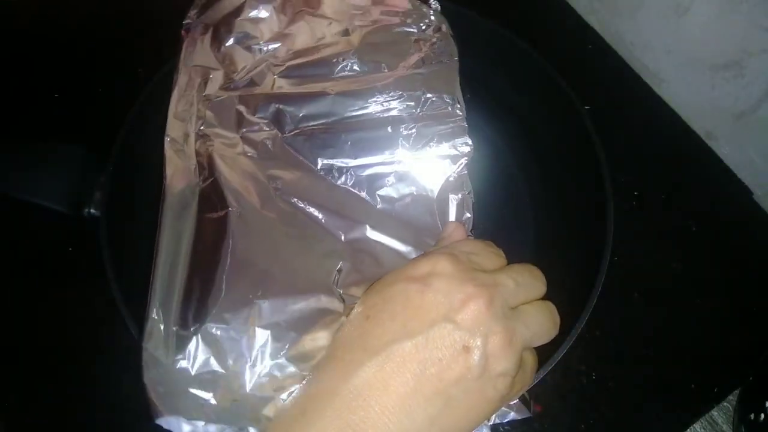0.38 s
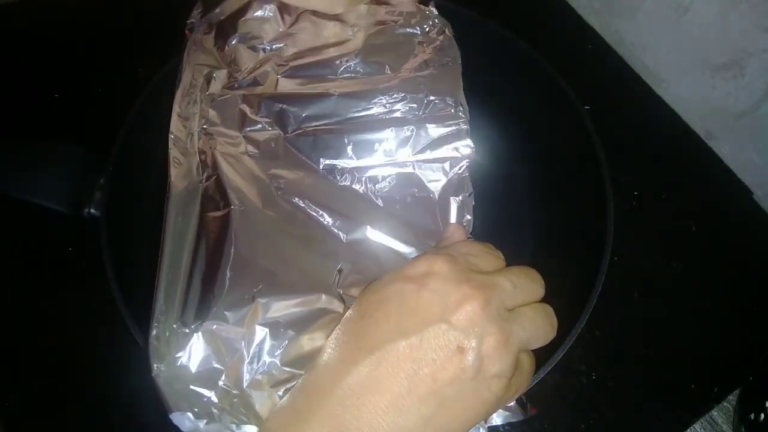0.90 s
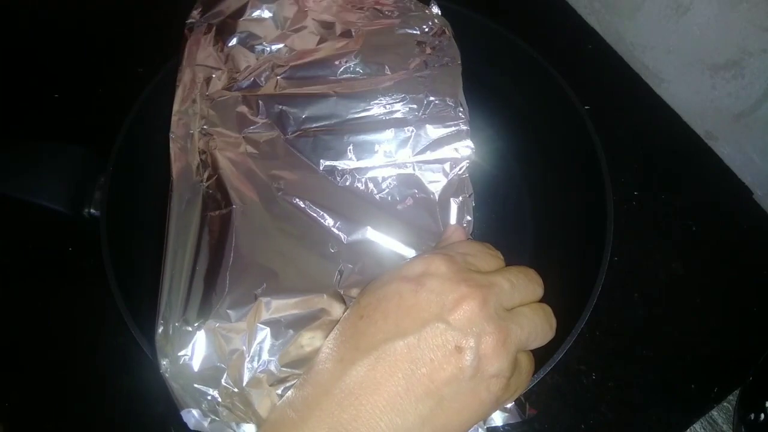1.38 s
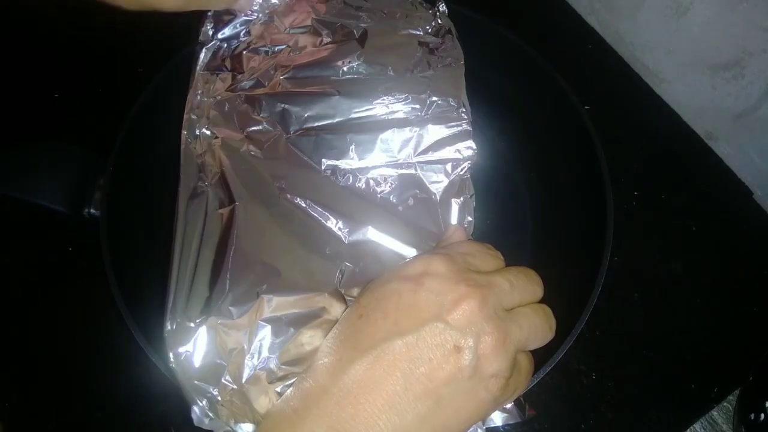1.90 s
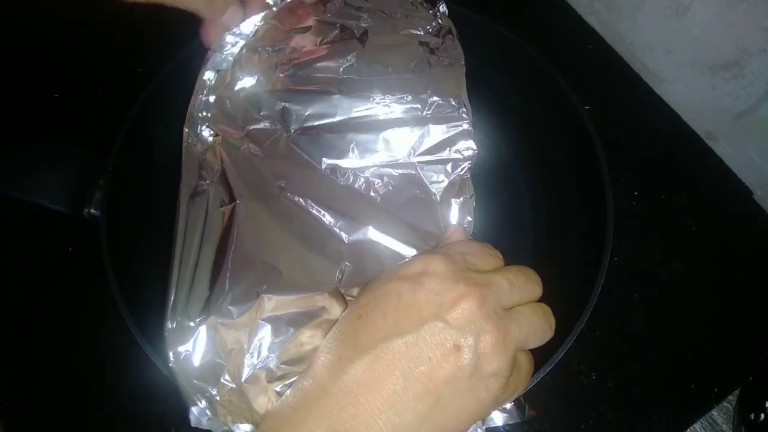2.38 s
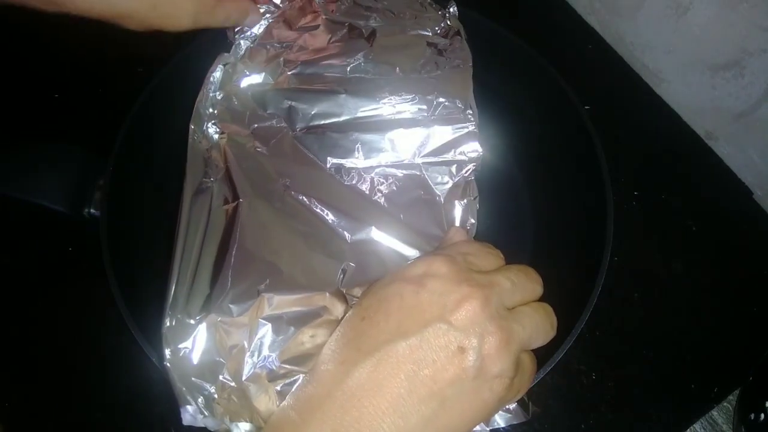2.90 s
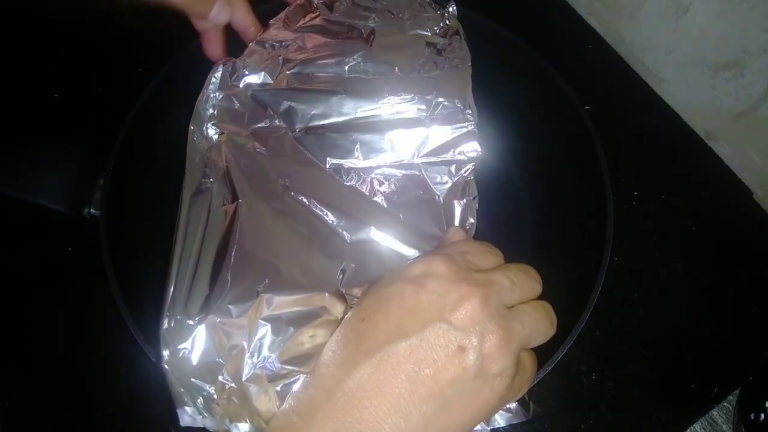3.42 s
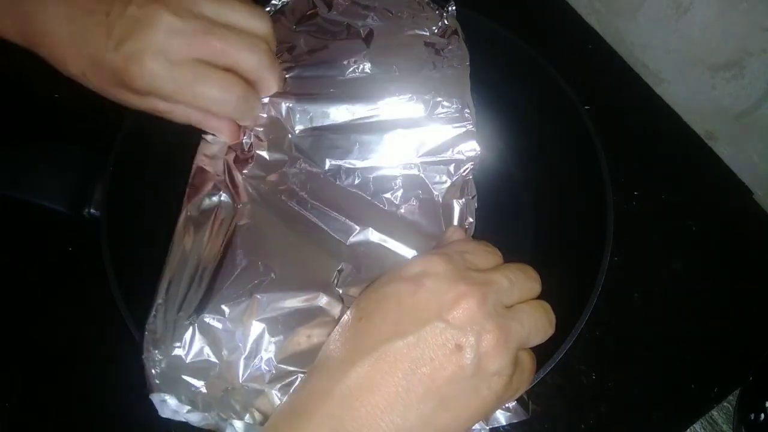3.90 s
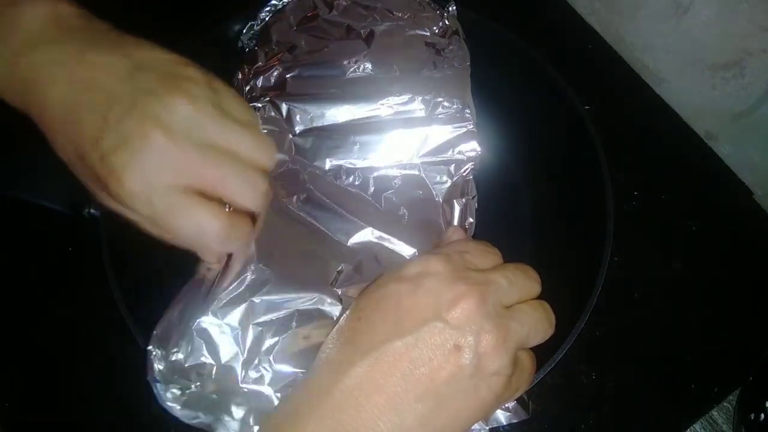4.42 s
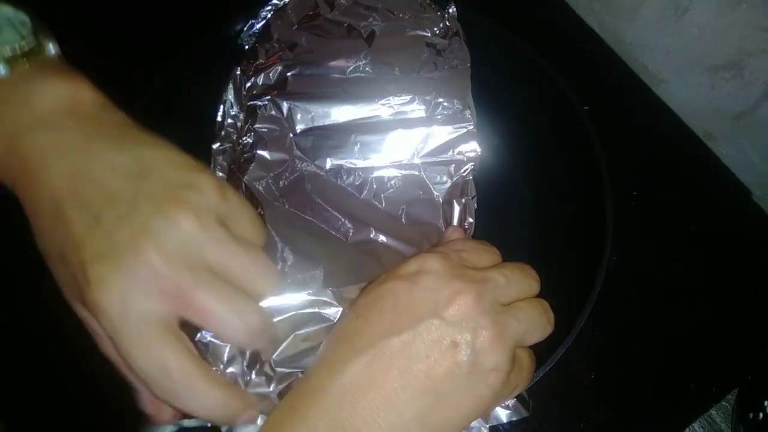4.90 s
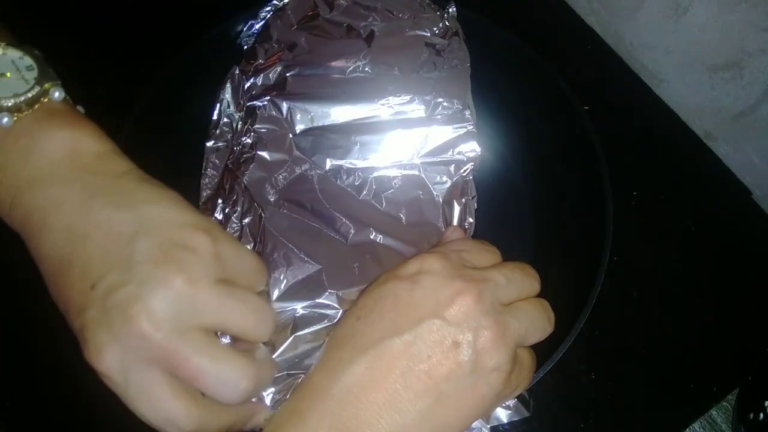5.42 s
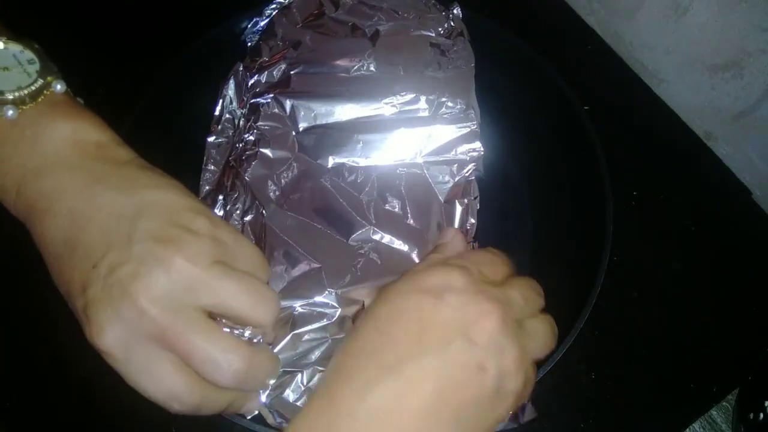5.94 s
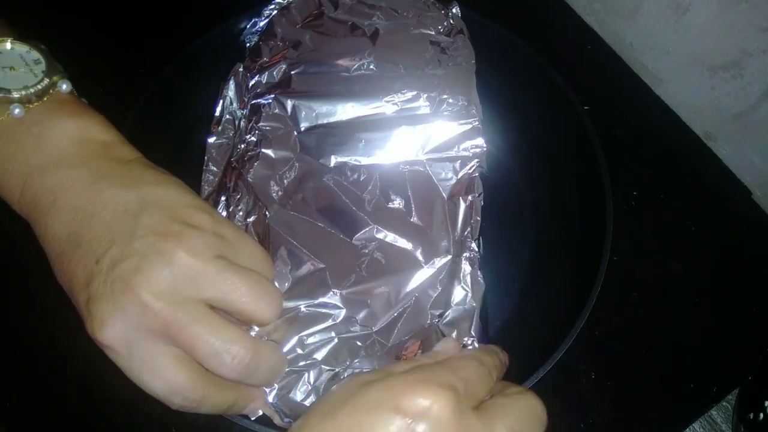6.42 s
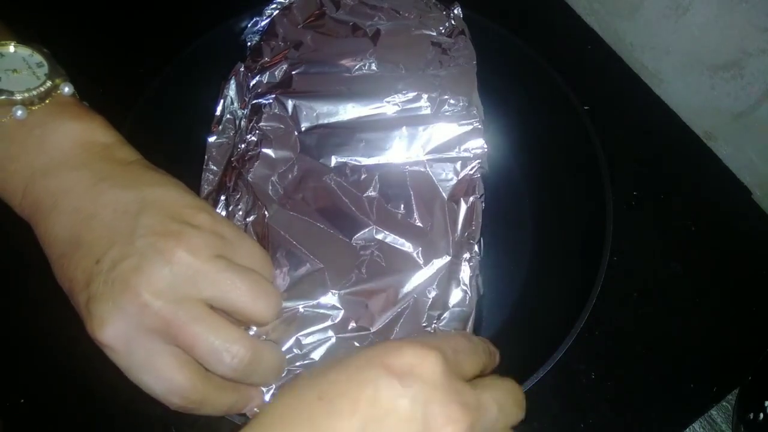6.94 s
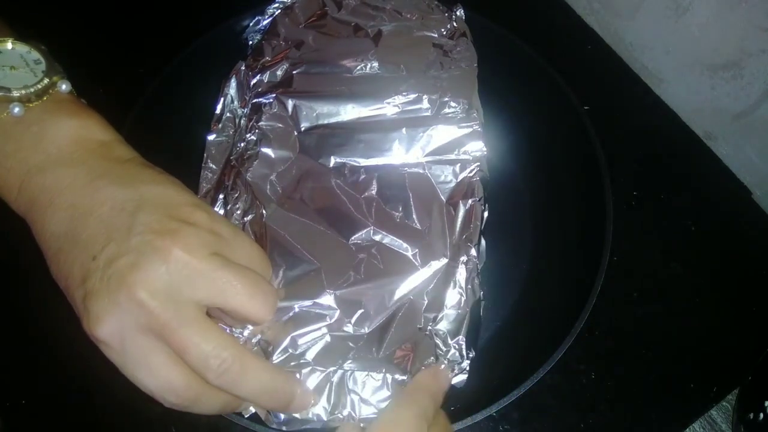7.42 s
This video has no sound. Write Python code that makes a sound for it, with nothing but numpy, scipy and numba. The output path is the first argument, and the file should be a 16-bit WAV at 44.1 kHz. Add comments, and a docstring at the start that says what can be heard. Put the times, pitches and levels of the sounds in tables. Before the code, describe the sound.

Thin aluminium foil crinkles and crackles brightly, close up, as hands squeeze and fold it in uneven bursts with sharp little snaps.

```python
"""Hands fold and press aluminium foil round a dish, close to a small microphone in a kitchen.
From the start an appliance hums faintly, breaking up and fading, and a low drone swells now and then.
Squeeze after squeeze buckles thousands of creases: each rings small patches and shivers the sheet for a few ms.
From about 0.9 s the air under the foil booms a little: narrow noise in short bursts.
The rustle is cut for an instant twice near 3.6 s; the drone swells most near 6 s and at the end."""
import sys
import numpy as np
from scipy import signal
from scipy.fft import rfft, irfft
from scipy.io import wavfile
from scipy.ndimage import uniform_filter1d
from numba import njit

SR = 44100
rng = np.random.default_rng(int(sys.argv[2]) if len(sys.argv) > 2 else 0)


def materialize(psi):
    """Save the field psi as 16-bit PCM at rate SR to the path in sys.argv[1].

    A 1-D psi becomes a single channel; in a 2-D psi each row is a channel.
    """
    bounded = np.clip(np.atleast_2d(psi).T, -1, 1)
    quanta = np.round(bounded * 32767).astype(np.int16)
    wavfile.write(sys.argv[1], SR, quanta)


def to_linear_factor(level_db):
    """Convert decibel levels (scalar or array-like) to linear amplitude factors."""
    exponent = np.asarray(level_db, float) / 20
    return 10 ** exponent


N = 333396  # samples, about 7.56 s
SPLIT_HZ = 3280  # between the low and the bright part of the foil


def level(x, db):
    """Set the rms level in dB."""
    return x * to_linear_factor(db) / np.sqrt(np.mean(x ** 2))


def curves(table):
    """Draw each column of a table as a line over time, one value per sample."""
    s, *columns = np.transpose(table)
    return [np.interp(np.arange(N) / SR, s, column) for column in columns]


def colour(x, points, size=4096):
    """Causal minimum-phase filter through (Hz, dB) points, from the folded cepstrum."""
    hz, db = np.transpose(points)
    bin_hz = np.arange(size // 2 + 1) * SR / size
    log_gain = np.interp(np.log(bin_hz + 1), np.log(hz), db) * np.log(10) / 20
    cepstrum = irfft(log_gain)
    cepstrum[1:size // 2] *= 2
    cepstrum[size // 2 + 1:] = 0
    impulse = irfft(np.exp(rfft(cepstrum)))
    return signal.fftconvolve(x, impulse)[:len(x)]


def band(x, lo_hz, hi_hz):
    """Band-pass."""
    return signal.sosfilt(signal.butter(2, [lo_hz, hi_hz], "bandpass", fs=SR, output="sos"), x)


def high_pass(x, order, hz):
    """High-pass."""
    return signal.sosfilt(signal.butter(order, hz, "high", fs=SR, output="sos"), x)


def noise():
    """White noise as long as the scene."""
    return rng.standard_normal(N)


def walk(rate):
    """Random levels held 1 / rate s and smoothed twice; spread near 1."""
    k = int(SR / rate)
    steps = np.repeat(rng.standard_normal(N // k + 1), k)
    return 1.3 * uniform_filter1d(uniform_filter1d(steps, k), k)[:N]


def bursts_db(start, hold, db, rise_db_s, fall_db_s, rest_db):
    """Level over time of bursts that build up, hold and die away; their powers add."""
    t = np.arange(0, N + 64, 64)[:, None] / SR
    building = rise_db_s * np.maximum(start - t, 0)
    dying = fall_db_s * np.maximum(t - start - hold, 0)
    power = np.sum(to_linear_factor(db - building - dying) ** 2, axis=1) + to_linear_factor(rest_db) ** 2
    return np.interp(np.arange(N) / SR, t[:, 0], 10 * np.log10(power))


def flicker(x, depth_db, top_hz):
    """The low end comes and goes in narrow patches a few hundredths of a second long."""
    hz, _, frames = signal.stft(x, SR, nperseg=1024)
    patchy = rng.standard_normal((len(hz) // 2 + 1, frames.shape[1]))
    patchy = uniform_filter1d(patchy, size=3, axis=1) * np.sqrt(3)
    patchy = np.repeat(patchy, 2, axis=0)[:len(hz)]
    depth = depth_db / (1 + (hz / top_hz) ** 4)
    gain = to_linear_factor(depth[:, None] * np.minimum(patchy, .6))
    # the mean power of the gain stays 1 at every frequency
    gain /= np.sqrt(np.mean(gain ** 2, axis=1, keepdims=True))
    return signal.istft(frames * gain, SR, nperseg=1024)[1][:N]


# mains hum that breaks up and fades, before its waver: time_s, level_db
HUM_LEVEL = [(0.0, -65.5), (0.63, -66), (0.73, -69), (1.56, -71), (1.68, -92), (1.77, -70), (1.83, -90),
             (1.87, -69.5), (3.11, -82.5), (3.16, -104), (3.2, -74), (3.58, -85), (3.68, -71), (3.77, -96),
             (3.83, -69.5), (4.12, -92), (4.27, -72), (4.34, -99), (4.46, -82), (4.51, -120), (4.57, -75),
             (4.67, -91), (5.14, -94), (5.18, -76), (5.39, -94), (5.54, -72.5), (5.96, -102), (6.0, -83),
             (6.19, -110), (6.25, -89), (6.72, -109), (6.8, -89.5), (7.37, -88), (7.45, -115), (7.5, -83),
             (7.56, -84)]


def mains_hum():
    """A steady 240 Hz sine whose level wavers."""
    sine = np.sin(2 * np.pi * 240 * np.arange(N) / SR)
    return np.sqrt(2) * sine * to_linear_factor(curves(HUM_LEVEL)[0] + 4 * walk(25))


# swells of the low drone, before the level waver: full_from_s, hold_s, level_db, pitch_hz, pitch_waver_share
DRONE_SWELLS = [(.05, 0.098, -64, 117, 0.024), (.38, 0.032, -64, 119.2, 0.032),
                (.62, .07, -68, 116.9, 0.032), (1.13, 0.037, -74, 111, 0.033),
                (1.41, 0.081, -63, 114.8, 0.034), (1.63, 0.14, -64, 113.3, 0.034),
                (1.9, 0.092, -71, 116, 0.032), (2.26, 0.033, -81, 120, .03), (3.3, 0.019, -75, 115, .03),
                (3.6, 0.024, -75, 122, 0.03), (4.25, 0.023, -85, 114, 0.025),
                (5.21, 0.024, -76, 112.4, .03), (5.52, 0.045, -77, 116.1, 0.031),
                (5.821, 0.025, -82, 112.8, 0.024), (6.05, 0.33, -53.5, 111.5, 0.016),
                (7.35, 0.098, -51.5, 110.8, 0.0082)]


def low_drone():
    """A sine that wavers in pitch and level, lifted in swells."""
    start, hold, db, hz, waver = np.transpose(DRONE_SWELLS)
    hz, waver = curves(np.transpose([start + hold / 2, hz, waver]))
    swell_db = bursts_db(start, hold, db, rise_db_s=343, fall_db_s=250, rest_db=-110)
    turns = np.cumsum(hz * (1 + waver * walk(29.64))) / SR
    return np.sqrt(2) * np.sin(2 * np.pi * turns) * to_linear_factor(swell_db + 2.5 * walk(30))


# colour of the handling rumble, only its shape counts: frequency_hz, density_db (per Hz)
RUMBLE_COLOUR = [(15, -52), (25, -12), (81, -0.5), (113, 1), (199, -4), (236, -3.5), (330, -13.5),
                 (430, -47), (730, -120)]
# low noises over time: time_s, rumble_db (gain on noise set to 12.1 dB rms), flutter_db (rms)
LOW_NOISES = [(0.0, -78.5, -74), (0.25, -76, -91), (1.05, -85.5, -80), (1.09, -74, -88), (1.26, -88, -117),
              (1.3, -81, -93), (1.74, -74, -76), (1.81, -79, -117), (1.87, -72, -81), (2.17, -99, -89),
              (2.3, -74, -67.5), (2.4, -92, -78), (2.76, -82, -84), (2.8, -90, -111), (3.18, -91, -76),
              (3.41, -81.5, -90), (4.12, -91, -69.5), (5.66, -93, -92), (6.15, -84.5, -83),
              (6.46, -76, -81), (6.5, -106, -99), (7.26, -89, -76), (7.33, -78, -102), (7.37, -86, -73),
              (7.41, -83, -101), (7.48, -88, -86), (7.52, -70, -117), (7.56, -78, -81)]
# booms of the air under the foil: full_from_s, hold_s, level_db
AIR_BOOMS = [(0.879, 0.034, -69), (1.536, 0.096, -67), (1.692, 0.028, -63), (2.38, 0.12, -72),
             (3.171, 0.04, -64.5), (3.568, 0.042, -73), (3.716, 0.077, -66), (4.657, 0.044, -66),
             (5.049, 0.087, -71.5), (5.37, 0.15, -65.5), (6.091, 0.089, -66), (6.777, 0.099, -71.5),
             (6.996, 0.17, -67), (7.259, 0.21, -68.5)]


def under_foil():
    """Boom and flutter of the air under the foil, and handling rumble: three bands of unsteady noise."""
    rumble_db, flutter_db = curves(LOW_NOISES)
    boom_db = bursts_db(*np.transpose(AIR_BOOMS), rise_db_s=400, fall_db_s=290, rest_db=-88)
    boom = band(band(noise(), 395, 506), 395, 506) * to_linear_factor(3.5 * walk(22.13))
    rumble = colour(noise(), RUMBLE_COLOUR, size=16384) * to_linear_factor(2.75 * walk(11))
    flutter = band(band(noise(), 525, 920), 525, 920) * to_linear_factor(3.0 * walk(21))
    return (level(boom, 0) * to_linear_factor(boom_db) + level(rumble, 12.1) * to_linear_factor(rumble_db)
            + level(flutter, 0) * to_linear_factor(flutter_db))


# sheet and microphone together, with the port's peak near 10 kHz: frequency_hz, gain_db
FOIL_COLOUR = [(350, -72), (600, -40.5), (868, -10), (1140, -7), (4530, -11), (6650, -7), (9610, 2.5),
               (14300, -12.5), (15700, -18.5)]


def through_foil(x):
    """Sheet and microphone colour every crease alike."""
    return colour(x, FOIL_COLOUR)


def heard_db():
    """How loud a unit shake is heard in the bright and in the low part of the foil's colour."""
    probe = through_foil(rng.standard_normal(SR))
    return [20 * np.log10(band(probe, lo, hi).std()) for lo, hi in ((5000, 14000), (900, 3500))]


def sheet(bright, dull, wander_db):
    """Dense shiver of the whole sheet; as its shape changes, the colour of the low part wanders."""
    out = high_pass(bright * noise(), 2, SPLIT_HZ)
    for top_hz in SPLIT_HZ / np.sqrt(2) ** np.arange(6):  # half-octave bands
        half_octave = dull * to_linear_factor(wander_db * walk(17)) * noise()
        out += band(half_octave, top_hz / np.sqrt(2), top_hz)
    return out


@njit
def ring(start, hz, cycles, size, n, sr):
    """Each patch is a damped sine that loses 60 dB in its number of cycles."""
    out = np.zeros(n)
    for k in range(len(start)):
        turn = np.exp((2j * np.pi - np.log(1000.) / cycles[k]) * hz[k] / sr)
        z = size[k] + 0j
        for i in range(start[k], min(n, start[k] + int(cycles[k] * sr / hz[k]))):
            out[i] += z.real
            z *= turn
    return out


def patches(start, bright_db, dull_db, cycles, scatter_db):
    """Every crease kicks six flat patches of random pitch; small ones ring high and weigh in so the sum is white."""
    shape = (len(start), 6)
    hz = 700 * (16000 / 700) ** rng.random(shape)
    high = 1 / (1 + (SPLIT_HZ / hz) ** 4)
    db = high * bright_db[:, None] + (1 - high) * dull_db[:, None]
    db = db + scatter_db * rng.standard_normal(shape)
    turns = cycles * np.exp(.5 * rng.standard_normal(shape)) * (hz / SPLIT_HZ) ** 1.26
    # the kick travels through the sheet, so patches start a little apart
    late = start[:, None] + (rng.exponential(size=shape) * .0006 * SR).astype(int)
    size = to_linear_factor(db) * hz / SPLIT_HZ / np.sqrt(turns) * np.sign(rng.standard_normal(shape))
    return ring(late.ravel(), hz.ravel(), turns.ravel(), size.ravel(), N, 1. * SR)


def decay(t60_s):
    """Share of energy left after one sample, for a fall of 60 dB in t60_s."""
    return np.exp(-2 * np.log(1000) / (t60_s * SR))


# squeezes of the fingers: full_from_s, hold_s, crackle_level_db, build_up_db_per_s, dying_away_db_per_s
FINGER_SQUEEZES = [(0.006, 0.049, -37.5, 476.5, 220), (0.125, 0.0056, -33, 343, 380),
                   (.16, 0, -47.5, 400, 300), (0.202, 0, -40, 600, 89), (0.358, 0.023, -34.5, 496, 137),
                   (.43, 0.016, -41, 300, 200), (0.509, 0, -35, 164, 126), (0.622, 0.023, -43, 1472, 200),
                   (.68, .1, -48, 400, 60), (0.865, 0.017, -41, 887, 38), (0.967, 0.042, -45, 1232, 594),
                   (1.026, 0.091, -42, 491, 684), (1.243, 0.04, -45.5, 822, 329),
                   (1.313, 0.027, -43, 700, 68), (1.558, 0.056, -38, 276, 650),
                   (1.684, 0.022, -30.5, 161, 440), (1.826, 0.029, -35.5, 103, 124),
                   (2.148, 0.12, -42, 45, 870), (2.243, 0.04, -33.5, 300, 155),
                   (2.33, 0.048, -45, 400, 300), (2.39, 0.086, -50.5, 600, 300),
                   (2.473, 0.026, -33, 672, 377), (2.543, 0.058, -37.5, 750, 114),
                   (2.719, 0.083, -46, 820, 268), (2.849, 0.12, -52.5, 1370, 537),
                   (3.058, 0.00042, -36.5, 710, 206), (3.165, 0.077, -33, 234, 550),
                   (3.342, 0.031, -39.5, 118, 296), (3.541, 0.011, -43.5, 215, 230),
                   (3.672, 0.16, -35.5, 4000, 132), (3.887, 0.012, -36, 760, 338),
                   (3.974, 0.064, -34.5, 151, 258), (4.1, 0.082, -39, 162, 360),
                   (4.322, 0.06, -36, 154, 340), (4.429, 0.059, -30.5, 190, 186),
                   (4.551, 0.017, -36, 204, 250), (4.657, 0, -27.5, 256, 455), (4.8, 0.0041, -34, 111, 38),
                   (4.908, 0, -32.5, 630, 142), (5.07, 0.0035, -35.5, 256, 112),
                   (5.305, 0.018, -35.5, 157, 212), (5.471, 0.021, -38.5, 33, 408),
                   (5.56, 0.046, -47, 148, 650), (5.683, 0.044, -50.5, 84, 830),
                   (5.853, 0.081, -35.5, 220, 347), (6.03, 0.1, -40.5, 318, 165),
                   (6.156, 0.049, -40, 1058, 530), (6.349, 0.00088, -36, 249, 48),
                   (6.542, 0.036, -38.5, 213, 85), (6.655, 0.13, -44, 1250, 43),
                   (6.91, 0.07, -46, 336, 729), (7.013, 0.015, -39, 620, 189), (7.19, 0.13, -47.5, 550, 90),
                   (7.354, 0.019, -38, 124, 41), (7.49, 0.001, -45, 240, 361)]
MEDIUM_DB = -44.5  # crackle level of a medium squeeze


def squeeze_db():
    """Crackle level under the fingers; foil left alone still crackles faintly."""
    return bursts_db(*np.transpose(FINGER_SQUEEZES), rest_db=-67)


def crackle(bright_db, dull_db, scatter_db, patch_db, tail_t60_s, tail_db):
    """Creases at random moments, most small and a few large, in flurries; the sheet shivers after them."""
    creases_per_s = 800 * to_linear_factor(3.0 * walk(70))
    start = np.flatnonzero(rng.random(N) < creases_per_s / SR)
    size_db = scatter_db * np.minimum(rng.exponential(size=N), 4)[start]
    energy = np.zeros(N)
    energy[start] = to_linear_factor(size_db) ** 2
    # the hands set the mean level; the flurries only move energy about
    mean = uniform_filter1d(energy, size=SR // 8) + 1e-9
    db = size_db - 10 * np.log10(mean[start]) + patch_db
    pole = decay(tail_t60_s)
    tail = (1 - pole) * signal.lfilter([1], [1, -pole], energy)
    shiver = np.sqrt(tail / mean) * to_linear_factor(tail_db)
    rings = patches(start, db + bright_db[start], db + dull_db[start], 17.4, 0.96)
    return rings + sheet(shiver * to_linear_factor(bright_db), shiver * to_linear_factor(dull_db), 0.73)


# low part over bright part at a medium squeeze; large loose flaps sound duller: time_s, low_part_db
CRACKLE_DULLNESS = [(0, -10.5), (.6, -16.5), (.9, -12.5), (1.2, -16.5), (1.6, -12), (2.0, -10), (2.5, -9.5),
                    (3.15, -9.5), (3.4, -18.5), (3.7, -10.5), (4.3, -13), (4.9, -13.5), (5.35, -12),
                    (5.7, -14), (6.5, -14.5), (7.56, -14)]


def small_creases(press_db, bright_gain, dull_gain):
    """The rustle of small creases follows the squeeze; harder squeezes sound brighter."""
    low_db = curves(CRACKLE_DULLNESS)[0] - 0.29 * (press_db - MEDIUM_DB)
    return crackle(press_db - bright_gain, press_db + low_db - dull_gain, scatter_db=0.93,
                   patch_db=-14, tail_t60_s=.14, tail_db=-3.0)


def snaps(start, bright_db, dull_db, patch_db, shiver_db, t60_s, rise_s):
    """A crack rings patches, and a shiver takes a moment to spread through the sheet."""
    # tight creases with little low part crack harder and shake the sheet less
    tight_db = .4 * np.maximum(bright_db - dull_db - 18, 0)
    patch_db, shiver_db = patch_db + tight_db, shiver_db - tight_db / 2
    spread = np.exp(-1 / (rise_s * SR))
    shiver = []
    for db, t60 in ((bright_db, t60_s), (dull_db, 0.54 * t60_s)):
        energy = np.zeros(N)
        np.add.at(energy, start, to_linear_factor(db + shiver_db) ** 2)
        energy = signal.lfilter([1], [1, -decay(t60)], energy)
        shiver.append(np.sqrt(signal.lfilter([1 - spread], [1, -spread], energy)))
    rings = patches(start, bright_db + patch_db, dull_db + patch_db, 8, 0.85)
    return rings + sheet(*shiver, 0.25)


# lone ticks, before the ring and shiver trims: time_s, level_db, low_over_bright_db
LONE_TICKS = [(0.106, -31, -20), (0.317, -28.5, -22), (0.617, -35, -23), (0.6963, -33, -27),
              (0.7457, -36, -24), (0.7936, -33, -27), (0.953, -32, -23), (1.0081, -34, -21),
              (1.1406, -31, -34), (1.1623, -37, -26), (1.1726, -36, -32), (1.191, -34, -28),
              (1.2204, -33, -31), (1.269, -38, -28), (1.276, -31, -15), (1.3102, -28, -16),
              (1.3468, -27.5, -20), (1.409, -30, -33), (1.491, -35.5, -9), (1.6317, -29, -25),
              (1.7548, -27.5, -21), (1.9215, -33, -20), (1.9624, -34, -22), (1.975, -36, -23),
              (1.9874, -33, -26), (1.9934, -37, -25), (2.0704, -30.5, -23), (2.0777, -32, -12),
              (2.0904, -33, -11), (2.0984, -34, -15), (2.1206, -33, -20), (2.132, -30, -22),
              (2.212, -31, -13), (2.3391, -28, -21), (2.7124, -32, -23), (2.864, -34.5, -19),
              (3.017, -51, -12), (3.1103, -30, -17), (3.2844, -31.5, -24), (3.3024, -35, -24),
              (3.3174, -28, -37), (3.4171, -36, -27), (3.4254, -41, -25), (3.4877, -38, -27),
              (3.508, -37, -28), (3.7007, -29, -24), (4.0871, -34, -23), (4.1131, -34, -25),
              (4.2338, -42, -24), (4.2623, -28, -31), (4.2974, -29, -35), (4.7454, -33, -12),
              (4.8539, -29, -26), (5.0003, -28, -21), (5.1355, -26, -29), (5.2185, -36, -18),
              (5.253, -29, -25), (5.4645, -29, -18), (5.5828, -32, -22), (5.8267, -38, -25),
              (6.0102, -31.5, -26), (6.0601, -32, -26), (6.2983, -33, -24), (6.5043, -42, -22),
              (6.5166, -35, -20), (6.833, -36, -22), (6.8628, -39, -22), (6.9904, -36, -29.5),
              (7.1731, -41, -20), (7.196, -36.5, -22), (7.4707, -29, -25), (7.54, -32, -16.5)]


def ticks(bright_gain, dull_gain):
    """Small creases that pop and are damped at once."""
    s, db, low_db = np.transpose(LONE_TICKS)
    return snaps((s * SR).astype(int), db - bright_gain, db + low_db - dull_gain,
                 patch_db=-3, shiver_db=-4, t60_s=.012, rise_s=.0007)


# sharp clicks at the onset of some snaps: time_s, first_click_peak_db
ONSET_CLICKS = [(2.3155, -25), (2.3687, -23), (2.7445, -25), (3.828, -23), (4.658, -20), (6.4008, -21),
                (6.9375, -28), (7.3632, -24)]


def onset_clicks():
    """Each onset is three clicks within a millisecond, in the bright part of the foil's colour."""
    s, db = np.transpose(ONSET_CLICKS)
    late = rng.random((len(s), 3)) * .001 * np.arange(3) / 2
    at = ((s[:, None] + late) * SR).astype(int)
    clicks = np.zeros(N)
    np.add.at(clicks, at, to_linear_factor(db)[:, None] * np.array([1, -.8, .5]))

    def bright(x):
        """Foil colour with the low part thinned out."""
        return high_pass(through_foil(x), 1, SPLIT_HZ)

    return bright(clicks) / np.abs(bright(signal.unit_impulse(512))).max()


# single creases, strong and faint, before the ring and shiver trims: time_s, level_db, low_over_bright_db
SINGLE_SNAPS = [(0.0433, -41, -27), (0.1274, -27.5, -4), (0.2024, -30, -23), (0.2628, -26, -16),
                (0.302, -30, -27), (0.355, -29, -33), (0.4738, -25, -24), (0.508, -30, -34),
                (0.554, -27, -26), (0.636, -28, -31), (0.7126, -25, -33), (0.8563, -27, -20),
                (0.8756, -21.5, -17), (0.9163, -25, -20), (1.043, -23, -24), (1.1024, -25, -24),
                (1.239, -21, -38), (1.253, -25.5, -36), (1.3056, -29, -20), (1.3243, -20.5, -14),
                (1.5264, -33, -19.5), (1.543, -30, -25), (1.587, -19.5, -22), (1.6532, -24, -24),
                (1.673, -22, -2), (1.8023, -16.5, -35), (1.843, -19.5, -30), (2.0392, -34, 3.5),
                (2.0578, -27, -10), (2.142, -27, -30), (2.2393, -21, -11), (2.2564, -24, -18),
                (2.2673, -18, -4), (2.29, -22, -2), (2.315, -22, -24), (2.369, -26, -42),
                (2.3995, -25.5, -29), (2.4193, -28, -13), (2.45, -27, -8), (2.4707, -28, -7),
                (2.4819, -25.5, 2), (2.546, -36, -25), (2.5686, -32, -26), (2.6409, -29, -25),
                (2.662, -26.5, -22), (2.7434, -29, -29.5), (2.783, -30, -1), (2.7974, -41, -5),
                (2.8518, -28, -7), (2.9085, -32, -26), (2.9174, -35, -16), (2.9452, -30, -23),
                (3.0455, -35, -24), (3.062, -23, -7), (3.1624, -21.5, -3.5), (3.2313, -23, -14),
                (3.336, -22, -45), (3.466, -29.5, -17), (3.526, -24.5, -35), (3.543, -26, -33),
                (3.6143, -31.5, -12), (3.6726, -32, -26), (3.7486, -19.5, -8), (3.768, -18, -25),
                (3.794, -19, -23), (3.8265, -28, -24), (3.888, -24.5, -31), (3.9634, -19.5, -13),
                (3.9793, -20.5, -21), (3.996, -22, -16), (4.0223, -39, -27.5), (4.0324, -28, -17),
                (4.1325, -20, -31), (4.1664, -29, -28), (4.3136, -20, -31), (4.357, -15, -31),
                (4.402, -20, -21), (4.4236, -15.5, -25), (4.4653, -24, -4), (4.5148, -20, -23),
                (4.5462, -16, -37), (4.6103, -22, -12), (4.6483, -45, -21), (4.658, -21, -25),
                (4.7247, -39, -19), (4.789, -39, -21), (4.8985, -31, -34), (4.945, -33, -31),
                (5.057, -32, -23), (5.084, -20, -18.5), (5.284, -34, -29.5), (5.3857, -38, -21),
                (5.3952, -24.5, -21), (5.5624, -28, -30), (5.6343, -30, -30), (5.6676, -30, -36),
                (5.6765, -31, -28), (5.7008, -28, -27), (5.708, -30, -29), (5.775, -31, -26),
                (5.7973, -27, -18), (5.8462, -20, -30), (5.893, -25, -20), (5.9295, -29, -23),
                (6.0327, -39, -28), (6.0798, -18, -33), (6.118, -21, -25), (6.161, -23.5, -36),
                (6.265, -29.5, -23), (6.324, -24, -37), (6.341, -20.5, -27), (6.399, -44, -37),
                (6.4558, -23.5, -13), (6.5365, -24, -9), (6.5506, -16.5, -15), (6.6144, -20, -29),
                (6.6531, -21, -41), (6.6953, -23, -28), (6.7705, -32, -16), (6.9023, -24, -29),
                (6.9378, -29, -21), (6.9505, -28.5, -9), (7.0057, -22, -33), (7.277, -24.5, -27),
                (7.342, -24.5, -6), (7.363, -16, -13.5), (7.4125, -20, -13.5), (7.4457, -24, -32),
                (7.4899, -20.5, -32)]


def single_creases(press_db, bright_gain, dull_gain):
    """Single creases, strong and faint, and middling ones at random moments that follow the squeeze."""
    s, db, low_db = np.transpose(SINGLE_SNAPS)
    # 5 middling creases a second, none while the foil is nearly still
    random_start = np.flatnonzero((rng.random(N) < 5 / SR) & (press_db > -48))
    size, dullness = rng.standard_normal((2, len(random_start)))
    press = press_db[random_start]
    # the softer the squeeze, the further middling creases stand out of the rustle
    middling_db = press - 0.14 * (press - MEDIUM_DB) + 13.5 + size
    start = np.r_[(s * SR).astype(int), random_start]
    db = np.r_[db, middling_db]
    low_db = np.r_[low_db, -25 + 5.5 * dullness]
    return snaps(start, db - bright_gain, db + low_db - dull_gain,
                 patch_db=-6.5, shiver_db=-10, t60_s=.022, rise_s=.001)


# instants when the rustle falls silent: middle_s, length_s
SILENT_INSTANTS = [(3.6285, .005), (3.6515, .006)]


def hush():
    """A gate: 0 in the silent instants, 1 elsewhere."""
    t = np.arange(N) / SR
    return np.prod([np.abs(t - s) > length / 2 for s, length in SILENT_INSTANTS], axis=0)


def foil():
    """Rustle, single creases and ticks sound through one sheet and microphone, over a faint even hiss."""
    gains = heard_db()
    press_db = squeeze_db()
    creases = small_creases(press_db, *gains) + single_creases(press_db, *gains) + ticks(*gains)
    gate = hush()
    hiss = level(band(noise(), 2500, 15000), -67)
    return through_foil(creases * gate) + onset_clicks() + gate * hiss


def scene():
    """One microphone hears everything, the same in both channels."""
    # thin foil radiates almost nothing low down
    thin = high_pass(foil(), 4, 760)
    # the low noises dip briefly now and then, the hum by half as many dB
    dips = to_linear_factor(3 * np.minimum(walk(12), 0))
    mix = flicker(thin + dips * under_foil(), depth_db=19.0, top_hz=1200)
    return np.tile(mix + np.sqrt(dips) * mains_hum() + low_drone(), (2, 1))


def roll_off(x):
    """The treble ends steeply here."""
    return signal.sosfilt(signal.butter(12, 15870, fs=SR, output="sos"), x)


def record(dry):
    """The sharpest peaks are rounded off below a ceiling of 0.17 of full scale."""
    ceiling = .17
    mix = ceiling * np.tanh(dry / ceiling)
    return roll_off(mix)


dry = scene()
out = record(dry)
materialize(out)
```